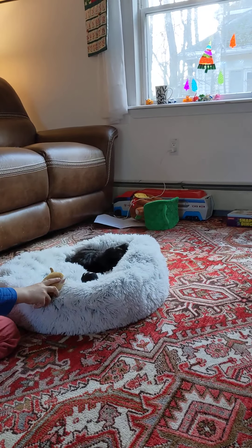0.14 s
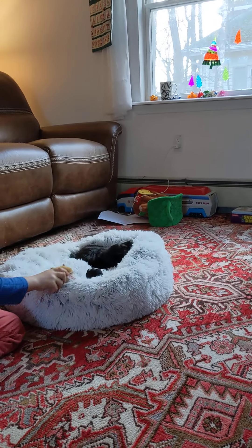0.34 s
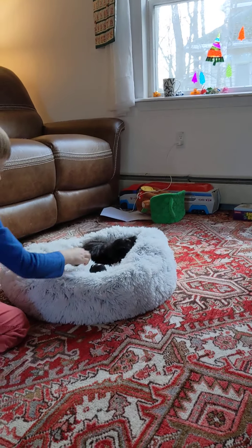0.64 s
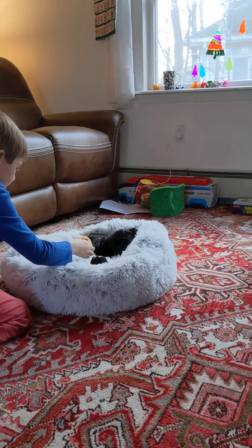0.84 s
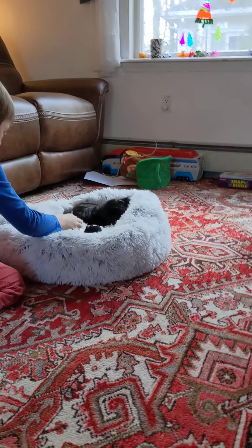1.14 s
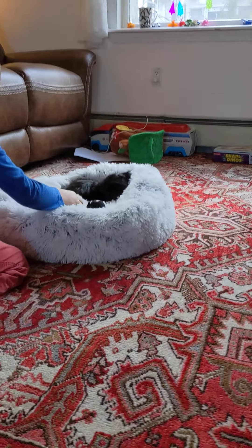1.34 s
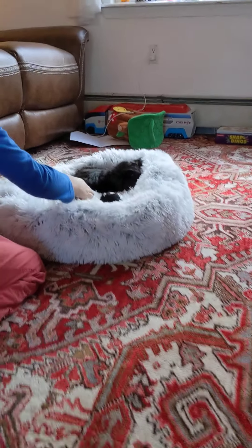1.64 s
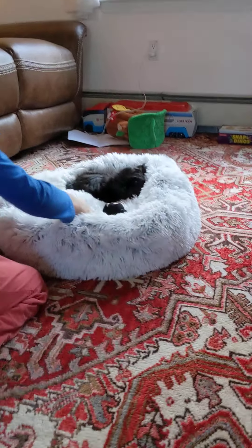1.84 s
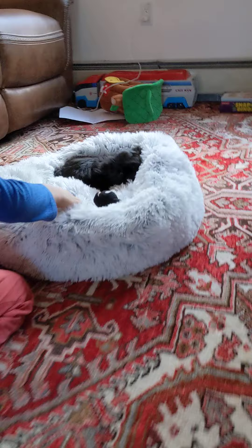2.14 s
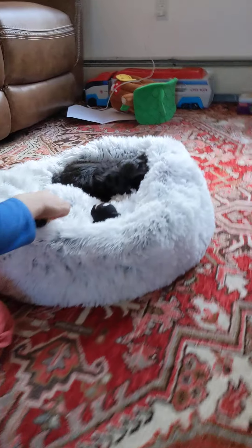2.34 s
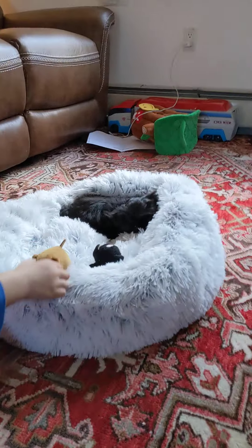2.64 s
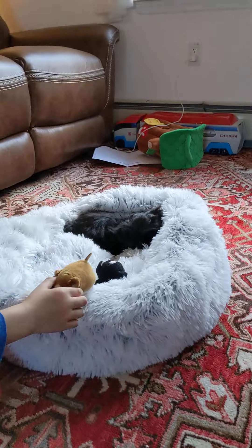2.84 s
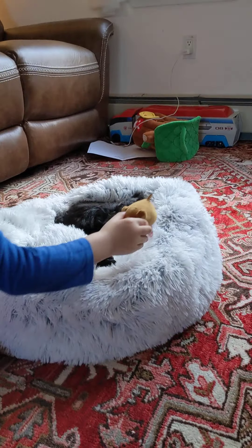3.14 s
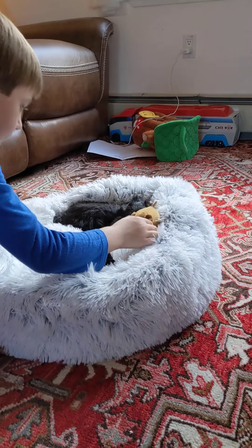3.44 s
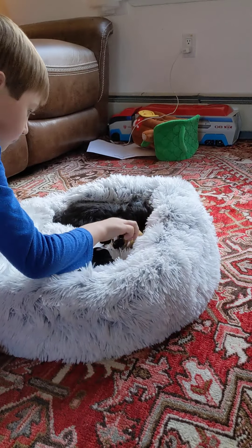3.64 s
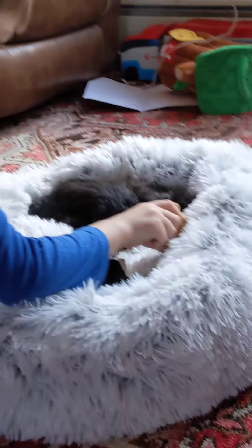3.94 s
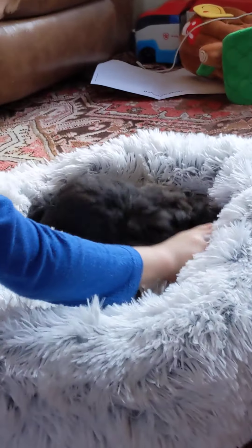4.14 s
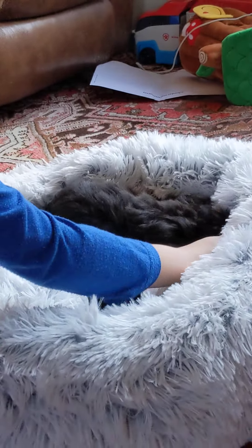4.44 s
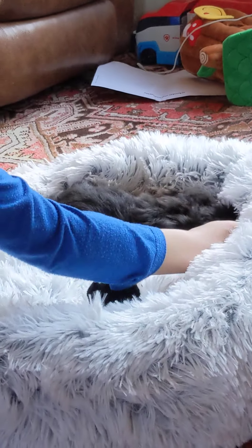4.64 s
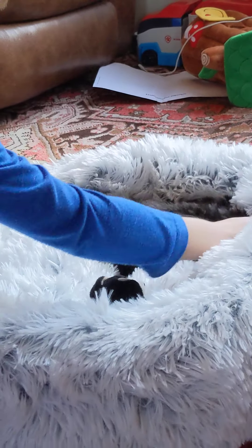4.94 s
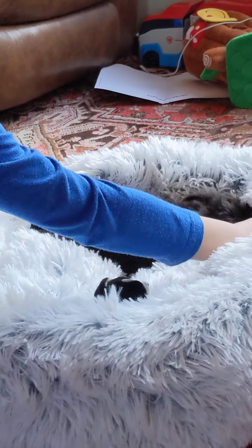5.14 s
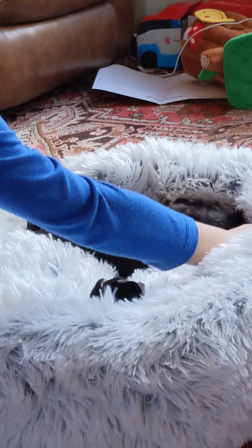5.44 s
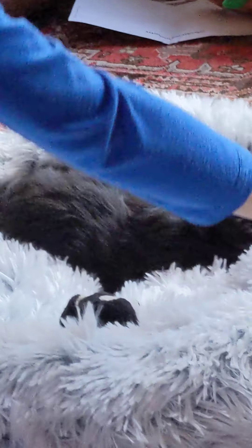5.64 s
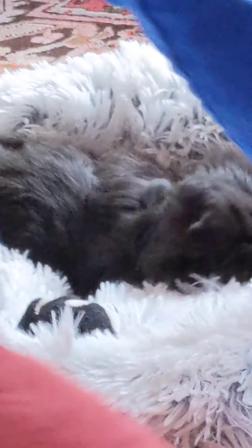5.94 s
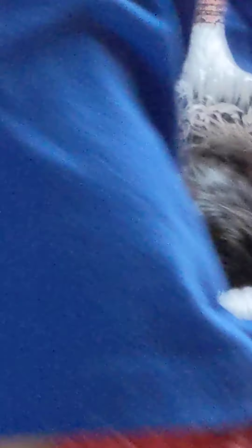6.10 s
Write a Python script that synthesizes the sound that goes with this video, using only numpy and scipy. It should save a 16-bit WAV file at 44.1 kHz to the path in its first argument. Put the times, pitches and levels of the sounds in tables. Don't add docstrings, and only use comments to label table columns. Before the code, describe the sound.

Close handling of a hollow toy in a fluffy bed, a metre or two from a phone. Knees bump the floorboards, then the toy clatters and clicks as fabric rustles. Blunt finger pops and scratchy slides hit the right microphone midway. Later come lighter scattered ticks, brief rings and snaps, growing busier near the end over a faint steady hum and short room echo.

```python
import sys
import numpy as np
from scipy import signal
from scipy.fft import rfft, irfft, next_fast_len
from scipy.io import wavfile
from scipy.ndimage import uniform_filter1d

SR = 44100
rng = np.random.default_rng(int(sys.argv[2]) if len(sys.argv) > 2 else 0)


def wav_record(signal):
    frames = np.transpose(np.atleast_2d(signal))
    bounded = np.clip(frames, -1, 1)
    quanta = np.round(bounded * 32767).astype(np.int16)
    wavfile.write(sys.argv[1], SR, quanta)


def invert_db(level):
    return 10 ** (np.asarray(level, dtype=float) / 20)


N = 276410
SIZE = next_fast_len(N + SR)
TIME, FREQ = np.arange(N) / SR, np.arange(SIZE // 2 + 1) * SR / SIZE
PORT_LAG = 13
PLACES = 6


def colour(x, points):
    hz, db = np.transpose(points)
    gain = invert_db(np.interp(np.log(FREQ + 1), np.log(hz), db))
    return irfft(rfft(x, SIZE) * gain, SIZE)[..., :N]


def level(x, rms_db):
    return x * invert_db(rms_db) / np.sqrt(np.mean(x ** 2))


def walk(rate_hz):
    hold = int(SR / rate_hz)
    steps = np.repeat(rng.standard_normal(N // hold + 1), hold)
    return 2.11 * uniform_filter1d(uniform_filter1d(steps, hold), hold)[:N]


def swells(top_s, rise_s, fall_s, db):
    edge_db = -13
    coarse_s = TIME[::32]
    since_s = coarse_s - top_s[:, None]
    rise_s, fall_s = np.maximum(rise_s, .002)[:, None], np.maximum(fall_s, .002)[:, None]
    away = np.where(since_s < 0, -since_s / rise_s, since_s / fall_s)
    power = invert_db(2 * (db[:, None] + edge_db * away)).sum(axis=0)
    return np.interp(TIME, coarse_s, np.sqrt(power))


def grains(per_second, scatter_db, count=2):
    size = (count, N)
    slips = (rng.random(size) < per_second / SR) * rng.standard_normal(size)
    return slips * invert_db(scatter_db * np.minimum(rng.exponential(size=size), 4))


def ring(hz, width_hz, size=1500):
    t = TIME[:size]
    contact = 1 - np.exp(-(3 * hz * t) ** 2)
    return np.sin(2 * np.pi * hz * t) * np.exp(-np.pi * width_hz * t) * contact


def diffuse():
    alike = np.sinc(2 * FREQ * 2.2 * PORT_LAG / SR)
    mid, side = rfft(rng.standard_normal((2, SIZE)))
    sign = np.array([[1], [-1]])
    return irfft(mid * np.sqrt(1 + alike) + side * np.sqrt(1 - alike) * sign, SIZE)[:, :N]


def direct(x, lag):
    return np.array([invert_db(-3.5) * np.roll(x, lag), x])


# delay_ms, level_db
REFLECTIONS = [
    (3.7, -21),
    (9.0, -15),
    (12.5, -14),
    (18.0, -16),
]
# freq_hz, t60_s
ROOM_DECAY = [(150, 0.5), (600, 0.41), (2500, 0.33), (7000, 0.4), (14000, 0.35)]


def room(feeds, tail_db):
    t, tails = TIME[:SR * 3 // 4], 0
    noise = diffuse()[:, :PLACES * len(t)].reshape(2, PLACES, -1)
    hz, t60_s = np.transpose(ROOM_DECAY)
    for centre_hz in 90 * 2. ** np.arange(8):
        edges_hz = [centre_hz / np.sqrt(2), centre_hz * np.sqrt(2)]
        band = signal.sosfilt(signal.butter(2, edges_hz, "band", fs=SR, output="sos"), noise)
        tails = tails + band * 1000 ** (-t / np.interp(np.log(centre_hz), np.log(hz), t60_s))
    tails = invert_db(tail_db) * tails * (1 - np.exp(-t / 0.0061))
    for delay_ms, db in REFLECTIONS:
        jitter = 1 + .06 * rng.standard_normal((2, PLACES))
        path = (delay_ms * SR / 1000 * jitter).astype(int)
        tails[np.arange(2)[:, None], np.arange(PLACES), path] += invert_db(db)
    return irfft((rfft(tails, SIZE) * rfft(feeds, SIZE)).sum(axis=1), SIZE)[:, :N]


# freq_hz, density_db
HUM_SPECTRUM = [(15, -49), (25, -42), (72, 3), (130, -22), (309, -3), (373, -8), (489, -6.5), (1260, -13),
                (2350, -15), (3820, -28.5), (6210, -23.5), (13600, -41.5), (16000, -29)]


def house_hum():
    return level(colour(diffuse(), HUM_SPECTRUM), -59) * invert_db(0.073 * walk(2.84))


# top_s, half_length_s, rumble_db, thud_re_rumble_db
WEIGHT_SHIFTS = [(0.064, 0.054, -47, -20), (0.295, 0.023, -34, -13), (0.356, 0.073, -32, -11.5),
                 (0.517, 0.059, -37.5, -3.5), (0.77, 0.13, -53, 1), (1.218, 0.14, -47, 7),
                 (1.47, 0.14, -48.5, -6.5), (1.686, 0.071, -52, 12.5), (1.718, 0.063, -44, 3),
                 (1.872, 0.072, -46, 0.5), (1.996, .06, -54, -3), (2.106, 0.034, -56, 16.5),
                 (2.137, 0.036, -47, -9), (2.26, 0.098, -48.5, 8.5), (3.1, 0.072, -59.5, 13.5),
                 (3.31, 0.12, -53, 0), (3.5, 0.1, -51, -13), (3.687, 0.052, -55, 0),
                 (4.125, 0.42, -53.5, -26), (4.43, 0.14, -52, -22.5), (4.968, 0.53, -53.5, -30),
                 (5.392, 0.054, -62, 10), (5.996, 0.056, -69, 21), (6.097, 0.054, -39, -4.5),
                 (6.2, 0.059, -48.5, -3)]


def bumps():
    rest_rumble_db, rest_thud_db = -64.5, -63.5
    top_s, half_s, db, thud_db = np.transpose(WEIGHT_SHIFTS)
    noise = diffuse()
    rumble = level(colour(noise, [(30, -38), (50, 14.0), (85, 13), (120, -54), (300, -85)]), 0)
    thud = level(colour(noise, [(60, -93), (105, -2), (200, -6.0), (320, -11), (800, -43)]), 0)
    rumble_gain = np.hypot(swells(top_s, half_s, half_s, db), invert_db(rest_rumble_db))
    thud_gain = np.hypot(swells(top_s, half_s, half_s, db + thud_db), invert_db(rest_thud_db))
    return rumble * rumble_gain + thud * thud_gain * invert_db(1.17 * walk(25.11))


# start_s, peak_db, ring_hz, width_hz
FLOOR_BLOWS = [(0.263, -24, 74.4, 31), (.263, -31.5, 196, 34), (.29, -28, 62, 20), (.315, -38, 190, 61),
               (.335, -39, 265, 60), (.35, -33.5, 249, 50), (0.365, -37, 240, 45), (0.384, -32, 218, 50),
               (0.421, -29.5, 109, 24), (.474, -34, 110, 36), (0.531, -32.5, 62.6, 13),
               (0.965, -40, 204, 79), (.995, -38.5, 141, 30), (1.99, -38, 49.7, 13),
               (0.334, -24.5, 121, 17), (0.362, -25.5, 136, 36), (0.382, -20.5, 92, 33),
               (0.502, -37, 58.5, 15), (6.074, -31, 54.4, 7.2)]


def thumps():
    out = np.zeros(N + 6000)
    for start_s, db, hz, width_hz in FLOOR_BLOWS:
        at = int(start_s * SR)
        out[at:at + 6000] += invert_db(db + 2.0) * ring(hz, width_hz, size=6000)
    return out[:N]


# start_s, top_s, end_s, level_db
PORT_SLIDES = [
    (1.678, 1.69, 1.706, -29),
    (2.166, 2.22, 2.243, -19.5),
    (2.309, 2.325, 2.355, -23),
    (1.6, 1.946, 2.15, -50),
    (2.024, 2.14, 2.283, -37),
    (2.492, 2.508, 2.524, -40),
    (2.572, 2.587, 2.599, -32),
    (2.604, 2.61, 3, -55),
]
# freq_hz, density_db
SKIN_SPECTRUM = [(88, -15), (150, -7), (398, -7), (649, -1.5), (1240, -3.5), (2220, -2.5), (4500, -10),
                 (7200, -6), (10200, -24), (16000, -37)]


def finger_slides():
    swell, out = np.zeros(N), np.zeros((2, N))
    for start_s, top_s, end_s, db in PORT_SLIDES:
        ramp = np.interp(TIME, [start_s, top_s, end_s], [0, 1, 0])
        swell += invert_db(db) * ramp ** np.where(TIME < top_s, 1.3, .5)
    skin = level(colour(grains(32000, .7, count=1)[0], SKIN_SPECTRUM), 0)
    out[1] = swell * skin * invert_db(.6 * walk(120))
    return out


# start_s, peak_db, push_ms, left_share_db
PORT_TAPS = [
    (1.4459, -14.5, 0.24, -40),
    (1.689, 0, 0.074, -27),
    (2.147, -28, 0.021, -30),
    (2.214, -19.5, 0.44, 1),
    (2.26, -7.5, 0.26, -30),
    (2.2864, -21.5, 0.13, -30),
    (2.5059, -13.5, 0.066, -32),
    (2.541, -30, 0.15, -28),
    (2.61, -30, 0.042, -25),
]


def finger_taps():
    out = np.zeros((2, N))
    t_ms = TIME[:600] * 1000
    tick = ring(8000, 3600, size=600) + 0.43 * ring(8700, 7600, size=600)
    for start_s, db, push_ms, left_db in PORT_TAPS:
        press = -.6 * np.exp(-.5 * ((t_ms - 3 * push_ms) / push_ms) ** 2)
        late_ms = np.maximum(t_ms - 4 * push_ms, 0)
        leak = np.exp(-late_ms / (.3 + 2.8 * push_ms))
        press += (1 - np.exp(-late_ms / push_ms)) * leak * np.cos(late_ms * 0.7) * 0.76
        press += np.roll(tick, int(.004 * push_ms * SR)) * .004 / push_ms ** 2
        at = int(start_s * SR)
        out[:, at:at + 600] += invert_db(db) * invert_db(np.array([[left_db], [0]])) * press
    return out


# top_s, rise_s, fall_s, weave_db, fibres_re_weave_db
HAND_STROKES = [(.39, 0.36, 0.092, -64, 4), (.6, 0.089, 0.24, -53.5, -6.5),
                (0.684, 0.046, 0.0084, -36, -13), (1, 0.085, 0.18, -52.5, -10),
                (1.18, 0.17, 0.017, -63, 14.5), (1.193, 0.003, 0.11, -28, -7.5),
                (1.41, 0.04, 0.096, -48, -12), (1.3, .006, 0.1, -44, -26), (1.138, 0.013, 0.026, -51.5, 16),
                (1.72, 0.3, 0.45, -54.5, 2), (1.98, 0.57, 0.03, -53, -20), (2.06, 0.045, 0.061, -45, -11),
                (2.15, 0.061, 0.098, -43.5, -1), (3.13, 0.27, 0.054, -57.5, -2),
                (3.19, .008, 0.29, -52, -1), (3.33, 0.006, 0.15, -46, 2), (3.41, 0.024, 0.12, -48, -10),
                (3.54, 0.23, 0.055, -41.5, -13), (3.683, 0.012, 0.12, -40, -7),
                (4.03, 0.019, 0.3, -56.5, -27), (4.274, 0.006, 0.096, -45, -14),
                (4.432, 0.0048, 0.17, -51.5, -16), (5.305, 0.0067, 0.073, -50, -24),
                (5.272, .004, 0.046, -49, -12), (5.383, 0.0086, 0.092, -37, -16),
                (5.62, 0.059, 0.2, -42, -25), (5.87, 0.042, 0.096, -49, -5), (6.18, 0.17, 0.05, -44.5, -25),
                (0.48, 0.0049, 0.1, -46, 4), (5.585, 0.0053, 0.069, -47.5, 1)]
# top_s, fall_s, level_db
FOLD_PUSHES = [(.285, 0.19, -52), (0.492, 0.17, -41), (.686, 0.3, -53.5), (1.001, 0.065, -38),
               (1.205, 0.035, -38), (1.3, 0.042, -34), (1.46, 0.038, -50), (1.584, 0.048, -40),
               (1.72, 0.035, -45.5), (1.99, 0.095, -55.5), (2.15, 0.12, -45), (2.298, 0.13, -49),
               (2.52, 0.12, -48), (3.11, 0.024, -49), (3.36, 0.019, -41), (3.68, 0.052, -47.5),
               (4.002, 0.036, -57), (4.435, 0.11, -60), (4.6, 0.16, -59), (5.12, 0.031, -53),
               (5.285, 0.13, -59), (5.393, 0.017, -40), (5.63, 0.17, -42.5), (5.98, 1, -43.5),
               (6.12, 0.083, -38.5)]
# time_s, level_db
SHIFTING = [(0, -69.5), (.2, -72), (.45, -72), (.9, -71), (1.1, -52.5), (1.6, -61.5), (1.9, -53),
            (2.3, -61), (2.45, -66), (2.85, -74), (3.2, -54), (3.6, -59), (3.95, -71), (4.6, -77),
            (4.8, -82), (4.97, -89), (5.15, -69.5), (6.2, -54.5)]
# freq_hz, gain_db
FOLD_SPECTRUM = [(100, -44), (220, -2), (520, 2), (900, -2.5), (1600, -18)]
WEAVE_SPECTRUM = [(400, -22), (900, 0), (2200, 0), (3500, -3), (5000, -8), (9000, -24), (16000, -32)]
FIBRE_SPECTRUM = [(3000, -16), (4800, -4), (6800, 0), (8500, -4), (10500, -9), (15500, -10)]


def rustle():
    fidget_folds_db, fidget_fibres_db, push_rise_s = -2.5, -23, 0.025
    fidget = invert_db(np.interp(TIME, *np.transpose(SHIFTING)))
    top_s, rise_s, fall_s, db, fine_db = np.transpose(HAND_STROKES)
    weave_gain = np.hypot(swells(top_s, rise_s, fall_s, db), fidget)
    fibres_gain = np.hypot(swells(top_s, rise_s, fall_s, db + fine_db), fidget * invert_db(fidget_fibres_db))
    top_s, fall_s, db = np.transpose(FOLD_PUSHES)
    push_gain = swells(top_s, push_rise_s + 0 * top_s, fall_s, db)
    folds_gain = np.hypot(push_gain, fidget * invert_db(fidget_folds_db))

    patch_db = 1.3 * walk(55)
    folds = level(colour(grains(2500, 1.6), FOLD_SPECTRUM), -2)
    folds = folds * folds_gain * invert_db(1.6 * walk(18))
    weave = level(colour(grains(2500, 2.1), WEAVE_SPECTRUM), 1.0)
    weave = weave * weave_gain * invert_db(patch_db + 0.6 * walk(13))
    fibres = level(colour(grains(6000, 2.5), FIBRE_SPECTRUM), 1.03)
    fibres = fibres * (fibres_gain + invert_db(-79.5)) * invert_db(patch_db + .7 * walk(36))
    return folds + weave + fibres


# start_s, peak_db, ring_hz, width_hz, room_db
RINGING_PARTS = [(.279, -39.5, 420, 40, -8), (.47, -15, 1510, 870, 4.5), (.476, -21.5, 529, 66, -2.5),
                 (.476, -29.5, 292, 57, 1.5), (.615, -37.5, 340, 70, 5), (.651, -32.5, 688, 33, -17),
                 (.679, -33.5, 667, 45, -16), (1.13, -38, 3650, 150, 9), (1.133, -37.5, 2520, 150, 13),
                 (1.134, -32, 6650, 500, 6), (1.189, -36, 2500, 1500, 14), (3.67, -36, 518, 56, 8),
                 (3.683, -31.5, 528, 40, -2), (3.718, -34.5, 516, 41, -2), (3.994, -25, 2350, 520, 13.5),
                 (3.995, -22.5, 3300, 330, 8.5), (3.997, -36.5, 563, 78, 3.5),
                 (4.008, -18.5, 8440, 390, 1.5), (4.365, -43, 486, 48, -5), (4.43, -37.5, 674, 20, -6),
                 (4.433, -35.5, 503, 47, -3), (4.585, -44.5, 490, 60, 4), (4.622, -44, 490, 66, 9.5),
                 (4.64, -43, 650, 78, 0), (4.71, -32.5, 1190, 180, 3.5), (4.71, -36, 2148, 93, 7),
                 (4.71, -28.5, 3360, 550, 10), (4.71, -40, 3820, 680, 10), (4.712, -63, 2100, 7.1, 10),
                 (4.71, -47, 4350, 180, 10), (4.71, -44, 5700, 250, -8), (5.495, -39, 670, 40, 3),
                 (5.595, -35, 643, 42, 4), (5.67, -34, 830, 50, -3), (5.695, -40, 830, 75, 11),
                 (.5115, -11.5, 2690, 500, -11), (.484, -13, 6900, 1700, 5), (3.3195, 4, 13200, 3600, -4),
                 (3.3195, -14.5, 7250, 680, 7), (4.923, -36, 5200, 5000, -10), (5.008, -40, 3000, 1800, 5),
                 (5.182, -36, 7600, 3000, -8), (5.864, -28, 4200, 530, 2), (6.1665, -30, 5200, 5500, -8)]


def ringing_parts():
    near, far = np.zeros(N + SR), np.zeros((PLACES, N + SR))
    for k, (start_s, db, hz, width_hz, room_db) in enumerate(RINGING_PARTS):
        first = int((start_s + .001) * SR)
        at = slice(first, first + 9000)
        tone = ring(hz, width_hz, size=9000)
        near[at] += invert_db(db + 0.5) * tone
        far[k % PLACES, at] += invert_db(db + room_db + 1.5) * tone
    return near[:N], far[:, :N]


# start_s, peak_db, ring_hz, hollow_db, room_db
DULL_KNOCKS = [(0.475, -31, 1830, -5, -4), (.65, -26, 2610, -12, 2), (.678, -29, 2940, -5, -25),
               (.966, -29, 1220, -23, 3), (1.084, -30.5, 1840, -1, 4), (1.2942, -12, 1550, -12.5, 1.5),
               (2.077, -30.5, 1800, 3, 5), (3.652, -36, 2900, -13, 9), (3.815, -32.5, 2480, -7, 6.5),
               (4.157, -42.5, 1370, -8, 10.5), (4.267, -30, 1550, -3.5, -2), (4.576, -45, 2550, -11, 12),
               (4.651, -39, 3160, -1.5, -14), (5.264, -26.5, 3420, -4.5, -4), (5.468, -33, 1530, 4, -6),
               (5.612, -19.5, 1350, -12, -8), (5.641, -24, 1690, 0.5, -3), (5.833, -44, 2520, 9, 3.5),
               (5.891, -28.5, 1180, -3.5, -1.5), (6.078, -36, 1480, 1.5, 5.5)]
# start_s, peak_db, ring_hz, bright_db
NAIL_CLICKS = [(0.484, -33, 1490, -2), (.903, -32.5, 2820, -9.5), (0.995, -24, 1370, -17.5),
               (1.196, -10.5, 1380, -14), (3.319, -41, 5550, 2), (3.491, -26, 2720, -8.5),
               (3.678, -24.5, 2940, -6), (3.717, -28.5, 2300, -13), (4.432, -35, 3330, -9.5),
               (5.296, -20.5, 3200, -16), (5.924, -23.5, 3580, -40)]
# start_s, peak_db, ring_hz, bright_db, room_db
SEAM_SNAPS = [(.511, -17.5, 2240, -11.5, -9), (.663, -25.5, 6330, -7, -5), (1.139, -35, 2580, -7, -1),
              (1.209, -18.5, 1160, -12, 7), (1.901, -25, 2450, -23, 7), (2.015, -27, 3160, -22, 7),
              (2.79, -44.5, 3940, -5, 9), (3.002, -34.5, 2530, -16.5, 8.5), (3.18, -39.5, 3000, -9.5, 13.5),
              (3.404, -34.5, 1580, -9, 13), (3.994, -24, 3130, -10.5, 2.5), (3.994, -27.5, 4330, -2.5, 0),
              (4.497, -32.5, 5470, -25, -4), (4.923, -53, 2080, -12, -26), (5.183, -38.5, 1520, -11, -22),
              (5.375, -17.5, 2170, -11.5, 3.5), (5.538, -31, 3500, -21, 5.5), (5.72, -23.5, 1953, -18, 1),
              (5.863, -28, 3240, -32, 0), (6.166, -18, 3170, -17, 3)]
# start_s, peak_db, ring_hz, room_db
SMALL_TICKS = [(.476, -27.5, 312, -12), (0.532, -22, 1900, 2), (1.398, -27.5, 1300, 5),
               (1.397, -28, 3600, -3), (1.2945, -22, 5970, -8), (1.209, -21, 2400, -9),
               (1.228, -22.5, 3550, 12.5), (.627, -32.5, 2520, -5), (0.683, -21, 6470, -1),
               (1.815, -26, 4070, 9), (3.539, -25.5, 3700, -1), (4.282, -35, 2440, 10),
               (.476, -32, 11000, 0), (.49, -22, 11000, 0), (.6425, -39, 9000, 0), (2.61, -31, 7040, 2),
               (2.624, -40, 6070, 0), (2.792, -34, 11600, -6), (2.876, -41.5, 9000, 11.5),
               (2.991, -36, 5970, 11), (3.18, -29, 6900, 3), (3.294, -29, 10000, 5),
               (3.319, -16, 11900, 11), (3.491, -16.5, 11900, 6), (3.503, -19, 12000, -4),
               (3.539, -25, 6000, 2), (3.652, -39, 7500, -3), (3.678, -26, 12000, -9),
               (4.156, -41, 8100, -8), (4.267, -33, 6860, -6), (4.284, -29, 5200, 2),
               (4.436, -35, 6000, -2), (4.474, -44, 8000, 2), (4.575, -56, 4200, -7),
               (4.923, -39, 10800, -13), (5.262, -49, 7100, 0), (5.264, -27, 12000, -3),
               (5.296, -21, 12000, -11), (5.375, -9, 12100, -12), (5.536, -38, 11000, -5),
               (5.575, -23, 6960, 3), (5.574, -23, 12000, -8), (5.728, -30, 6000, 6),
               (5.817, -38, 12500, -11), (5.832, -35, 6500, 2), (6.179, -18, 4000, -4),
               (1.9004, -16, 12000, 6), (5.719, -32, 10000, -3), (5.862, -28, 7600, 10),
               (5.921, -34, 5100, 6), (6.078, -26.5, 5000, 0), (6.077, -31.5, 11500, 1),
               (6.167, -15, 9000, -3), (5.405, -20.5, 3570, -17), (5.575, -21.5, 3260, 9.5)]


def contacts():
    knocks = [(s, db, hz, hollow_db, -61, room_db) for s, db, hz, hollow_db, room_db in DULL_KNOCKS]
    clicks = [(s, db, hz, -10.5, bright_db, 1.6) for s, db, hz, bright_db in NAIL_CLICKS]
    snaps = [(s, db, hz, -28, bright_db, room_db) for s, db, hz, bright_db, room_db in SEAM_SNAPS]
    ticks = [(s, db, hz, -27, -39, room_db) for s, db, hz, room_db in SMALL_TICKS]
    return sorted(knocks + clicks + snaps + ticks)


# freq_hz, width_hz, level_db
TOY_MODES = [(530, 70, -3), (680, 50, -4), (330, 120, -10)]


def toy_contacts():
    spit_s, break_s = .00006, .0012
    near, far, events = np.zeros(N + SR), np.zeros((PLACES, N + SR)), contacts()
    hollow = sum(invert_db(db) * ring(hz, width_hz) for hz, width_hz, db in TOY_MODES)
    chance = rng.standard_normal((len(events), 4))
    noise = rng.standard_normal((len(events), 1500))
    spit = noise * np.exp(-TIME[:1500] / spit_s)
    spit /= np.linalg.norm(spit, axis=1, keepdims=True)
    spit = signal.lfilter([1, -2, 1], [1, -1.0, .35], spit)
    stages = noise[:, -160:] ** 3 * np.exp(-TIME[:160] / break_s)
    stages /= np.linalg.norm(stages, axis=1, keepdims=True)
    for k, (start_s, db, hz, hollow_db, bright_db, room_db) in enumerate(events):
        c = chance[k]
        edge = ring(6700 * (1 + 0.3 * c[0]), 2060)
        edge += 0.13 * ring(8600 * (1 + 0.39 * c[1]), 2000)
        edge += 0.31 * ring(18000, 4700)
        body = ring(hz, .3 * hz)
        body += invert_db(-7 + 2.5 * c[2]) * ring(.65 * hz, .22 * hz)
        body += invert_db(-6 + 2.5 * c[3]) * ring(1.38 * hz, .3 * hz)
        knock = invert_db(6.5) * body + invert_db(13.5 + .5 * bright_db) * spit[k] + invert_db(bright_db + 23.5) * edge
        knock = invert_db(-2.0) * (knock + 0.65 * np.convolve(knock, stages[k])[:1500])
        knock += invert_db(hollow_db - 0.5) * hollow
        first = int((start_s + .0015) * SR)
        at = slice(first, first + 1500)
        near[at] += invert_db(db) * knock
        far[k % PLACES, at] += invert_db(db + room_db) * knock
    return near[:N], far[:, :N]


# freq_hz, gain_db
CAPSULE_RESPONSE = [(100, 4), (8500, 3), (10500, -10.5), (16000, -20.5)]
# freq_hz, gain_re_right_db
LEFT_RESPONSE = [(60, -16), (110, -7), (200, 0), (380, 3), (700, -0.5), (1290, 3.5), (2380, 2.5),
                 (4400, -0.5), (8120, -5), (15000, 7)]


def scene():
    bed, sleeve = rustle()
    toy_near, toy_far = toy_contacts()
    ring_near, ring_far = ringing_parts()
    near, far = toy_near + ring_near, toy_far + ring_far
    turn = (TIME * 8 - np.arange(PLACES)[:, None]) % PLACES
    wander = np.maximum(1 - 2 * abs(turn / 2 - .5), 0)
    airborne = direct(near + invert_db(-7.0) * bed, lag=PORT_LAG)
    airborne += direct(invert_db(-2.5) * sleeve, lag=PORT_LAG - 1)
    airborne += room(far + invert_db(-3.5) * wander ** .5 * bed, tail_db=-33.0)
    airborne = colour(airborne, CAPSULE_RESPONSE)
    airborne[0] = colour(airborne[0], LEFT_RESPONSE)
    return airborne + house_hum() + bumps() + thumps() + finger_slides() + finger_taps()


def low_pass(x):
    return signal.sosfilt(signal.butter(12, 16990, fs=SR, output="sos"), x)


def record(dry):
    dry = signal.sosfilt(signal.butter(3, 36, "high", fs=SR, output="sos"), dry)
    dry = signal.sosfilt(signal.ellip(6, .5, 28, 15800, fs=SR, output="sos"), dry)
    return low_pass(dry)


dry = scene()
out = record(dry)
wav_record(out)
```